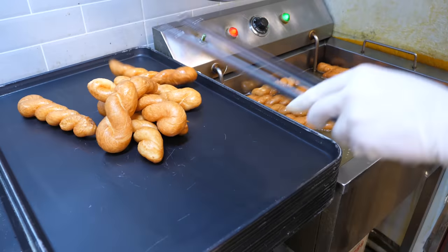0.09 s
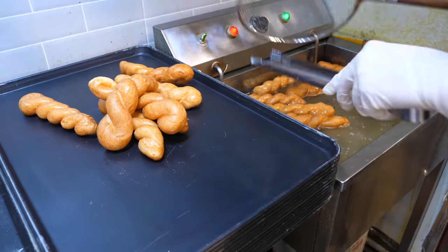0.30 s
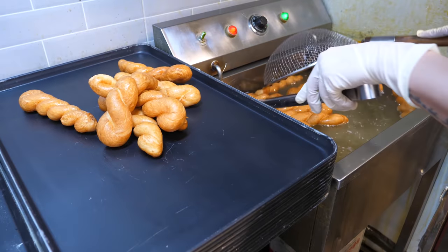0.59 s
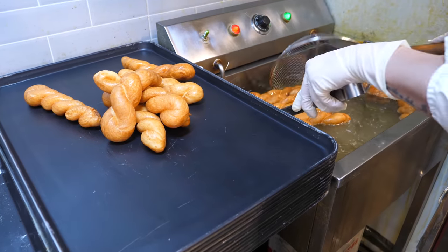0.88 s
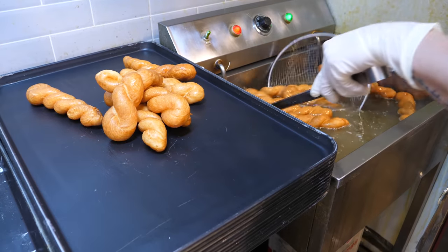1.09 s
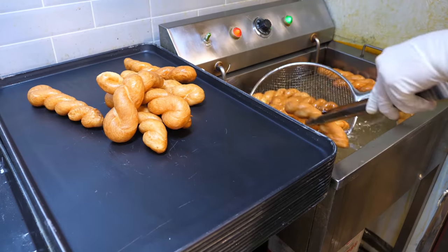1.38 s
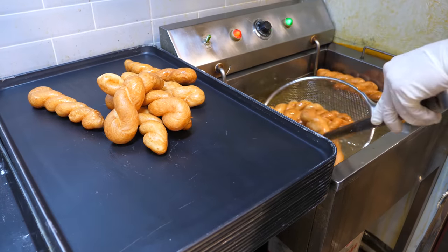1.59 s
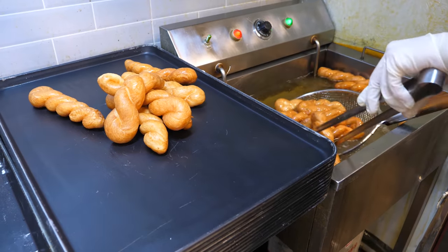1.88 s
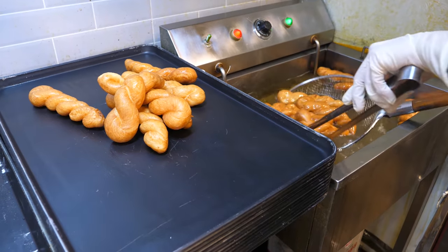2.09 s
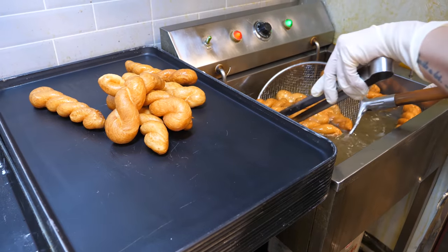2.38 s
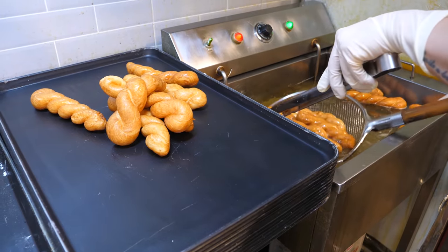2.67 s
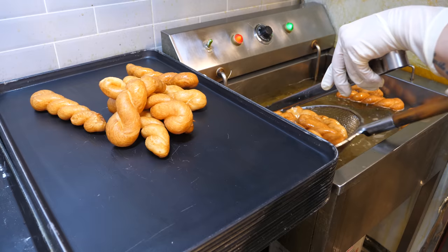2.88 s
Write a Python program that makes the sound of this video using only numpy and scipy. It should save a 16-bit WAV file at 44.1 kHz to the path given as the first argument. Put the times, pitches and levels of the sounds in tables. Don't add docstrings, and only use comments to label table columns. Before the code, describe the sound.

Metal strainer knocking and scraping on a steel fryer, tongs clinking, over a low fan hum

```python
import sys
import numpy as np
from scipy import signal
from scipy.fft import rfft, irfft, next_fast_len
from scipy.io import wavfile

SR = 44100
rng = np.random.default_rng(int(sys.argv[2]) if len(sys.argv) > 2 else 0)


def boost_factor(decibels):
    exponent = np.asarray(decibels, float) / 20
    return 10 ** exponent


def transcribe(signal):
    frames = np.atleast_2d(signal).T
    limited = np.clip(frames, -1, 1)
    pcm = np.round(limited * 32767).astype(np.int16)
    wavfile.write(sys.argv[1], SR, pcm)


N = 132300


def unit(x):
    return x / np.sqrt(np.mean(x ** 2) + 1e-20)


def along(points, hz):
    f, v = np.transpose(points)
    return np.interp(np.log(hz + 1), np.log(f + 1), v)


def curves(rows):
    start_s, *columns = np.transpose(rows)
    return [np.interp(np.arange(N) / SR, start_s, column) for column in columns]


def filtered(x, response):
    size = next_fast_len(len(x) + SR // 2)
    return irfft(rfft(x, size) * response(np.fft.rfftfreq(size, 1 / SR)), size)[:len(x)]


def noise(response):
    return unit(filtered(rng.standard_normal(N), response))


def dying(t60s, colour):
    hz, t, z = signal.stft(rng.standard_normal(SR // 2), SR, nperseg=128)
    decay = boost_factor(-60 * t / along(t60s, hz)[:, None])
    return signal.istft(z * colour(hz)[:, None] * decay, SR, nperseg=128)[1][:SR // 2]


def ringing(modes, spot_hz, octaves, contact_s, clean, far_db):
    t = np.arange(SR // 2) / SR
    vary_db = rng.uniform(-1.5, 1.5, len(modes))
    ring = np.zeros(len(t))
    for k, (hz, db, t60) in enumerate(modes):
        loss_db = min(6 * (np.log2(hz / spot_hz) / octaves) ** 2, far_db)
        level = (-1) ** k * boost_factor(db + vary_db[k] - loss_db - 60 * t / t60)
        ring += level * np.sin(2 * np.pi * hz * t)
    push = rng.standard_normal(SR // 10) * np.exp(-t[:SR // 10] / contact_s)
    push[0] = clean * np.linalg.norm(push)
    return signal.fftconvolve(ring, push / np.linalg.norm(push))[:len(t)]


def add(track, s, sound):
    track[round(s * SR):][:len(sound)] += sound


# pitch_hz [Hz], level_db [dB], t60_s [s]
EDGE = [(280, -3.5, 0.066), (451, -2, 0.047), (600, -3, 0.039), (721, 1, .05), (758, -11.5, 0.33),
        (883, -18, 0.086), (1100, -12, 0.049), (1390, -10, 0.046), (2040, -11, .06)]
SIDE_WALL = [(331, 0, .4), (354, -1.5, .33), (275, -15, .4), (441, -18, .25), (549, -13, .2),
             (587, -13, .14), (678, -11, .2), (755, -15, .15), (1092, -12, .19), (1513, -17, .12),
             (1938, -15, .18), (2266, -19, .14)]
LIP = [(356, -2, .36), (388, -1, .36), (302, -9, .2), (565, -3, .24), (738, -5, .15), (781, -11, .3),
       (1104, -11, .15), (1351, -13, .16), (1599, -11, .1), (1725, -8, .1), (1852, -9, .09),
       (1960, -6, .09), (2089, -9, .08), (2500, -9, .07)]
TRAY = [(267.6, -5.5, 0.18), (330, -2.5, 0.32), (387, -2.5, 0.14), (495, -4, 0.24), (551, -5.5, 0.55),
        (636, -5.5, .15), (736, -5.5, 0.063), (932, -28, 0.18), (1250, -20, .12), (1430, -12, 0.11),
        (1517, -3.5, 0.086), (1880, -5, 0.064), (2670, -17, .08), (3180, -11, 0.057)]
# start_s [s], level_db [dB], best_driven_hz [Hz], rattle_db [dB], rattle_tilt_db [dB per octave]
BLOWS = [
    (EDGE, [(.074, -45, 1500, -35.5, -3.5), (.181, -18, 600, -29, -5), (.575, -38, 1000, -37, -5), (.628, -39, 970, -34.5, -4)]),
    (SIDE_WALL, [(1.1665, -12.5, 450, -18.5, -4), (1.268, -24, 420, -30, -7), (1.305, -28.5, 330, -35.5, -29), (1.44, -29.5, 402, -34, -6)]),
    (LIP, [(1.8375, -13.5, 770, -15.5, -8)]),
    (TRAY, [(2.798, -22, 500, -16, -7), (2.806, -25, 750, -20.5, -7.5), (2.828, -22, 503, -29, -19), (2.844, -25.5, 1100, -23.5, -5.5), (2.856, -23, 400, -35, -9), (2.875, -23, 500, -36, -5), (2.957, -29, 600, -29, -4.5)]),
]
# pitch_hz [Hz], t60_s [s]
RATTLE_T60 = [(300, 0.28), (1500, 0.64), (5000, 0.096), (15000, 0.0057)]
RATTLE_RISE_S, RATTLE_HOLD_S = 0.00062, 0.025
CRACK_DB, CRACK_S = 5, 0.0021
MESH_LOW_HZ, MESH_TOP_HZ = 450, 6040


def knocks():
    out, t = np.zeros(N + SR), np.arange(SR // 2) / SR
    hold = 1.56 / (1 + (t / RATTLE_HOLD_S) ** 6)
    crack = boost_factor(CRACK_DB) * np.exp(-t / CRACK_S)
    shape = (1 - np.exp(-t / RATTLE_RISE_S)) * (0.78 + hold + crack)
    for modes, blows in BLOWS:
        for s, db, spot_hz, rattle_db, tilt_db in blows:
            def mesh(hz):
                tilt = boost_factor(tilt_db * np.log2(np.maximum(hz, 500) / 1000))
                low_cut = hz ** 2 / (hz ** 2 + MESH_LOW_HZ ** 2)
                return tilt * low_cut / (1 + (hz / MESH_TOP_HZ) ** 2) ** .5

            rattle = shape * dying(RATTLE_T60, mesh)
            ring = ringing(modes, spot_hz, octaves=1.4, contact_s=0.00083, clean=6, far_db=8)
            add(out, s, boost_factor(db) * ring + boost_factor(rattle_db) * rattle)
    return out[:N]


# pitch_hz [Hz], level_db [dB], t60_s [s]
WALL = [(323, -1, .4), (348, 0, .45), (387, -2, .35), (505, -9, .2), (563, -3, .3), (678, -8, .15),
        (736, -4, .13), (1060, -12, .14), (1098, -11, .16), (1351, -15, .14), (1530, -13, .12),
        (1940, -12, .12), (2200, -17, .1), (2890, -16, .1)]
# start_s [s], pressure_db [dB]
DRAG = [(.5, -75), (.65, -41), (1.05, -54.5), (1.1, -33.5), (1.45, -34), (1.75, -36.5), (2.05, -43),
        (2.4, -46.5), (2.55, -37), (3, -39.5)]
SLIPS_PER_S, SLIP_SPREAD_DB = 700, 4


def drag():
    happens = rng.random(N) < SLIPS_PER_S / SR
    slips = happens * rng.choice([-1, 1], N) * boost_factor(SLIP_SPREAD_DB * rng.standard_normal(N))
    force = unit(slips) + 0.11 * rng.standard_normal(N)

    def wall(f):
        total = 0
        for hz, db, t60 in WALL:
            width = 9 / t60
            total = total + boost_factor(db) * width * hz / (hz * hz - f * f + 1j * f * width)
        return total

    return boost_factor(curves(DRAG)[0]) * unit(filtered(force, wall))


# pitch_hz [Hz], level_db [dB], t60_s [s]
TONGS = [(1260, -3, .15), (1700, -9, .1), (2150, -4, .12), (4080, -4, .1), (5190, -7, .13), (6300, -8, .1),
         (7181, -1, .11), (7620, -6, .11), (8096, -1, .08), (9006, -7, .1), (10010, -5, .09),
         (11390, -5, .07), (12790, -8, .08), (13750, -9, .07)]
CLINK_S = [.073, .487, .730, .733, .750, .812, 2.079, 2.888, 2.079, .797]
# level_db [dB], best_driven_hz [Hz], spread_octaves [octaves]
CLINKS = [(-50, 10000, 0.87), (-56, 14000, 0.73), (-29.5, 7400, 1.0), (-25, 1580, .4), (-39, 3900, 0.43),
          (-29.5, 2150, 0.2), (-36, 5160, 0.64), (-49.5, 10000, 0.59), (-45, 15600, .35),
          (-40.5, 4200, 1.0)]
CHATTER_S, SHIMMER_DB = 0.0044, 4.5


def clinks():
    out = np.zeros(N + SR)
    for s, (db, spot_hz, octaves) in zip(CLINK_S, CLINKS):
        def near_spot(hz):
            return boost_factor(-6 * (np.log2((hz + 50) / spot_hz) / octaves) ** 2)

        shimmer = dying([(1000, 0.61), (15000, 0.053)], near_spot)
        ring = ringing(TONGS, spot_hz, octaves, CHATTER_S, clean=1.0, far_db=45)
        add(out, s, boost_factor(db) * (ring + boost_factor(SHIMMER_DB) * shimmer))
    return out[:N]


# pitch_hz [Hz], t60_s [s]
ROOM_T60 = [(300, .3), (3000, .25), (12000, .13)]


def room(metal):
    tail = dying(ROOM_T60, np.ones_like)
    late = np.pad(metal, (200, 0))
    return boost_factor(-12) * signal.fftconvolve(late, tail / np.linalg.norm(tail))[:N]


# pitch_hz [Hz], width_hz [Hz], level_db [dB]
FAN = [(124.6, 23.4, -36), (174.1, 9.2, -42), (1758, 28, -49.5), (2266, 30, -72.5), (2450, 34, -56),
       (2913, 61, -51), (4590, 190, -60), (5193, 110, -54), (7150, 130, -66), (8120, 870, -63.5),
       (12800, 4200, -61.5)]
SHAFT_HZ = 21.968
WHINE_DB, WHINE_WIDE_DB, WHINE_WIDEN = -2, -45.5, 1.92


def whine():
    f = SHAFT_HZ * np.arange(2 ** 14 + 1)
    bands = 0
    for hz, width, db in FAN:
        if hz > 1000:
            bands = bands + boost_factor(db) / np.sqrt(width) / (1 + ((f - hz) / (WHINE_WIDEN * width / 2)) ** 2)
    wide = boost_factor(WHINE_WIDE_DB) * (f > 900) * 30 / (f + 1) / (1 + (f / 7000) ** 4)
    level = (boost_factor(WHINE_DB) * bands + wide) * np.sqrt(SHAFT_HZ)
    harmonics = level * (rng.standard_normal(len(f)) + 1j * rng.standard_normal(len(f)))
    turn = irfft(harmonics) * len(f)
    phase = np.arange(N) * SHAFT_HZ / SR % 1
    return np.interp(phase, np.arange(len(turn)) / len(turn), turn)


# pitch_hz [Hz], density_db [dB per Hz]
SHOP = [(29, -7), (50, -4.5), (180, -12), (264, -16), (362, -16), (1780, -36), (1960, -38.5), (4670, -37),
        (16000, -63.5)]


def shop():
    out = boost_factor(-31) * noise(lambda f: boost_factor(along(SHOP, f))) + whine()
    for hz, width, db in FAN:
        under_db = 8 if hz > 1000 else 0
        out += boost_factor(db - under_db) * noise(lambda f: 1 / (1 + ((f - hz) / (width / 2)) ** 2))
    return out


# start_s [s], draught_db [dB], flutter_db [dB over the draught]
AIR = [(0.0, -24, 6), (0.06, -21, -29), (0.6, -19.5, -9.5), (0.68, -19, -19), (0.79, 1.5, 0.5),
       (1.29, -22.5, -20.5), (1.62, -7.5, -56), (1.75, -48, -4), (2.0, 1, -18.5), (2.05, -14.5, -23),
       (2.19, -9, 2), (2.24, -2, -22), (2.29, -15, 3), (2.52, -5, -14.5), (2.66, -19.5, -3),
       (2.73, -19.5, -6), (2.82, -34, 4), (3.0, -10, -20.5)]
# pitch_hz [Hz], density_db [dB per Hz]
BUFFET = [(3, 14), (9, 33), (18, -11), (28, 4.5), (45, -40), (90, -76)]
FLUTTER = [(15, 5.5), (30, 1.5), (43, 4), (70, -10.5), (110, -16), (200, -37)]
PUFF_S, PUFF_DB, PUFF_HZ, PUFF_WIDTH_S = .847, .1, 9.5, .062
AIR_TOP_HZ, SWING_TOP = 260, .8


def draught():
    t = np.arange(N) / SR - PUFF_S
    puff = boost_factor(PUFF_DB) * np.cos(2 * np.pi * PUFF_HZ * t) * np.exp(-(t / PUFF_WIDTH_S) ** 2 / 2)
    calm = 1 - np.exp(-(t / .13) ** 6)
    still = 1 - np.exp(-(t / .025) ** 2)
    swing_db, flutter_db = curves(AIR)

    def moving(colour):
        return noise(lambda f: boost_factor(along(colour, f)) * (f > 2) / (1 + (f / AIR_TOP_HZ) ** 8))

    swing = calm * moving(BUFFET)
    flutter = boost_factor(flutter_db) * np.maximum(calm, .3) * still * moving(FLUTTER)
    air = boost_factor(swing_db) * (swing + flutter)
    top = np.clip(.88 - abs(puff), .03, SWING_TOP)
    return puff + top * np.tanh(air / top)


# start_s [s], gain_db [dB]
GAIN = [(0, -4.5), (.3, -2), (.75, 0.5), (.86, -7), (1.05, -4), (1.2, 0.5), (1.95, 1), (2.15, -3.5),
        (2.3, -7.5), (2.5, -5), (2.7, -1), (3, 0.5)]


def scene():
    metal = knocks() + drag() + clinks()
    background = boost_factor(curves(GAIN)[0]) * shop()
    return (metal + room(metal) + background + draught())[None]


def low_pass(x):
    return signal.sosfilt(signal.butter(12, 16430, fs=SR, output="sos"), x)


def record(dry):
    clipped = np.clip(dry[0], -1, 1)
    band = filtered(clipped, lambda f: np.where(f < 15800, 1, boost_factor(-19)))
    return low_pass(band[None])


dry = scene()
out = record(dry)
transcribe(out)
```